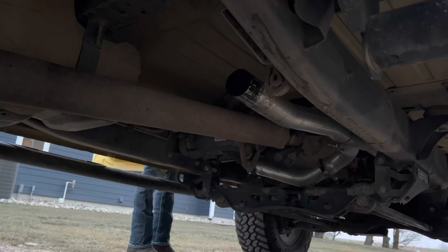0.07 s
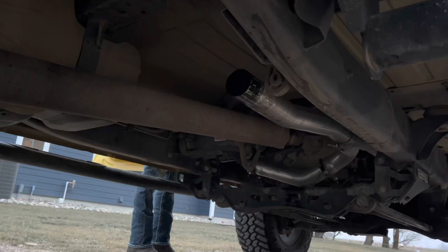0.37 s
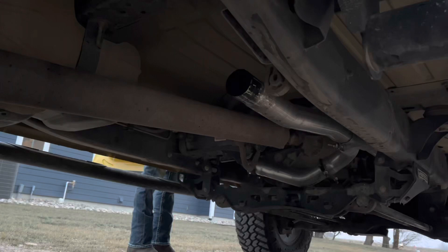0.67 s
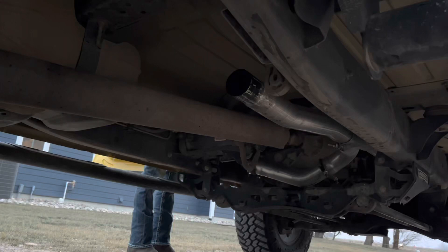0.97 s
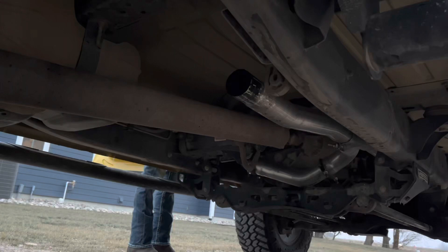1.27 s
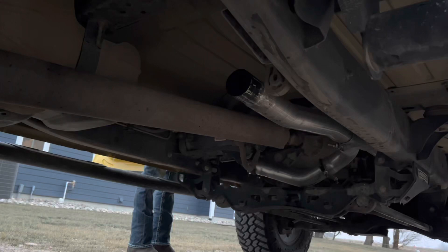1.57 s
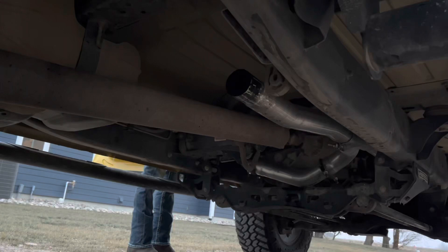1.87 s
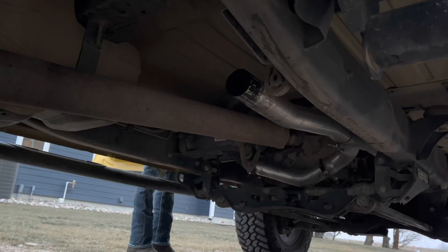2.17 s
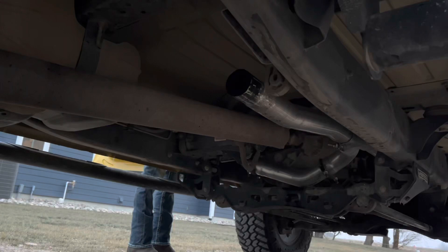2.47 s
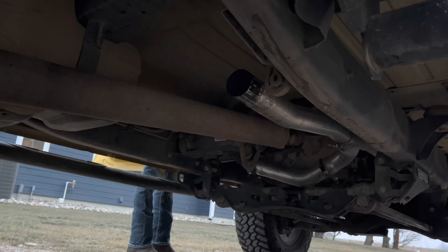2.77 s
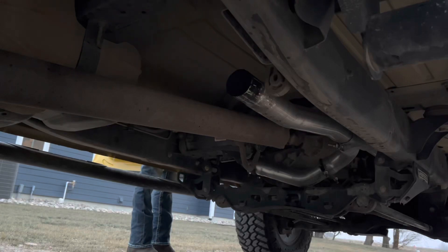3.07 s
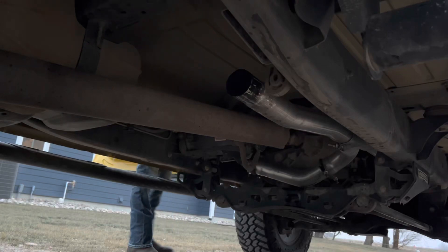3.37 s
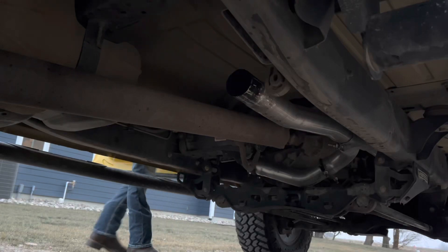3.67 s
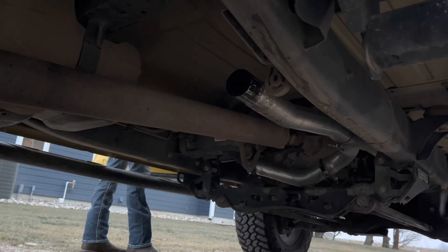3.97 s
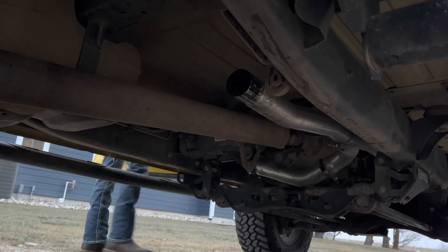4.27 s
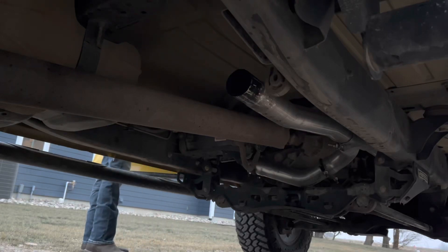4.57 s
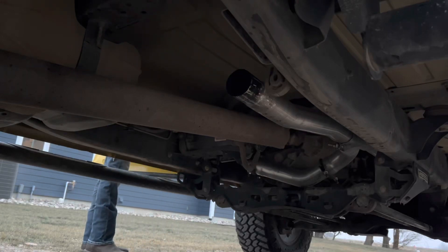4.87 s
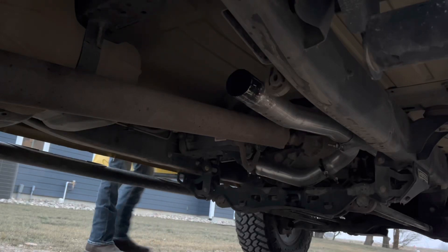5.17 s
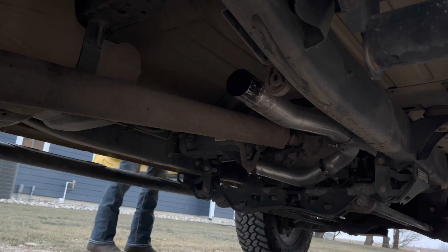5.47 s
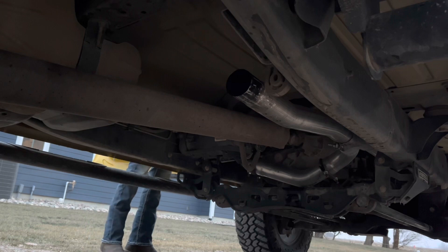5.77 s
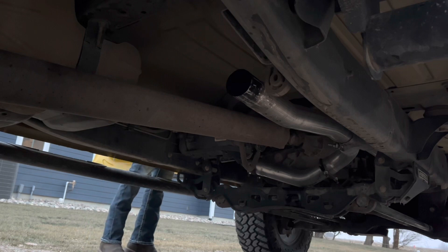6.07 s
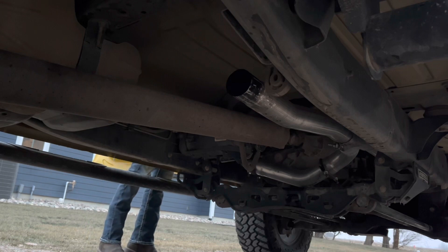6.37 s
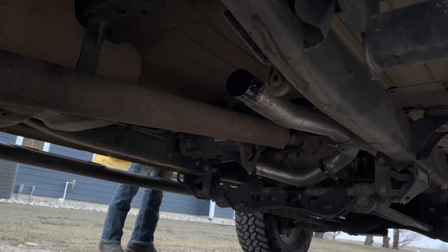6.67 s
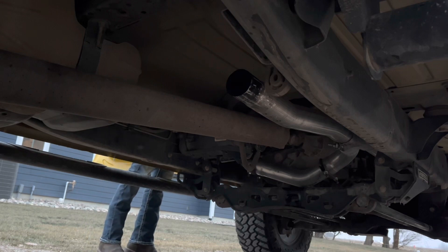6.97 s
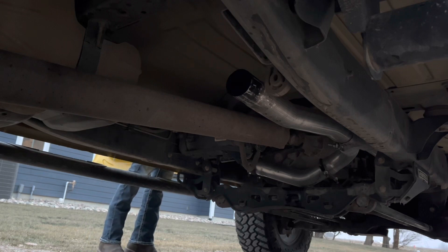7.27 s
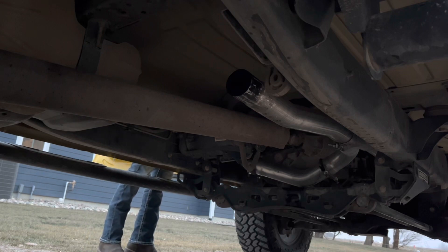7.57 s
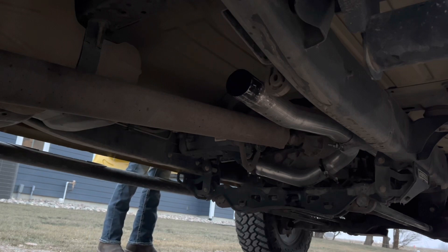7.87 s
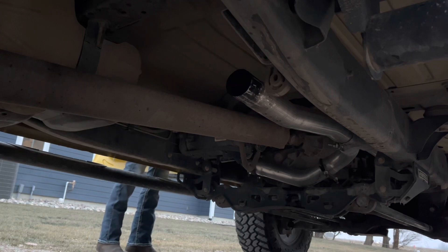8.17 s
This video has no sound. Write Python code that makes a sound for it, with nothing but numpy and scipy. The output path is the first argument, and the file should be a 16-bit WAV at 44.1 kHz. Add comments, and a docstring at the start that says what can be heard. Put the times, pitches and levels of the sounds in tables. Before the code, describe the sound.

A truck starts outdoors, heard close up from beneath its floor. After a short, nearly quiet moment comes a metallic clack and about a second of rhythmic starter cranking. The engine fires in a loud burst, the revs rise briefly and then gradually fall. It settles into a steady, throbbing idle, with bright ticks and the soft spitting of an exhaust leak.

```python
"""A cold V8 pickup starting outdoors, the microphone on the ground under its exhaust pipes.
A fuel pump primes over low rumble, the solenoid clacks and the starter whines against each compression.
The engine catches with a few bangs, flares and sinks to a loping idle. Two cylinder banks ring their
own pipes; every firing also puffs gas and ticks at the manifold, and one cylinder spits through a leak,
now and then harder. Close reflections between floor pan and ground colour the clatter."""
import sys
import numpy as np
from scipy import signal
from scipy.fft import rfft, irfft, next_fast_len
from scipy.io import wavfile
from scipy.ndimage import uniform_filter1d

SR = 44100
rng = np.random.default_rng(int(sys.argv[2]) if len(sys.argv) > 2 else 0)


def int16_out(signal):
    """Quantize to a 16-bit WAV file."""
    q = np.round(np.clip(np.atleast_2d(signal).T, -1, 1) * 32767)
    wavfile.write(sys.argv[1], SR, q.astype(np.int16))


N = 362502
TIME = np.arange(N) / SR
CRANK_START_S, CATCH_S, CRANK_END_S = 1.56, 2.4, 2.45

# the cylinders in firing order, levels relative: bank (0 or 1), pulse_db, travel_ms, puff_db, tick_db
CYLINDER_TRAITS = [(1, -0.5, 5.15, 9.5, 5), (0, -3.5, 7.09, -3, 2.5), (0, -0.5, 6.79, -3.5, 6.5),
                   (1, -0.6, 6.1, -5, -3.5), (0, -0.64, 5.184, 1, 8.5), (1, 2, 5.88, 2, 7.5),
                   (1, 5, 6.095, -0.5, -5), (0, -1.4, 4.56, -15, 6)]
# colour of the exhaust leak: frequency_hz, gain_db
SPIT_COLOUR = [(400, -18), (750, -13), (920, 0), (1150, -3.5), (1600, -3.5), (1830, -18), (2300, -9),
               (3400, -16), (6000, -27), (12000, -38)]


def undb(db):
    """Decibels to gain."""
    return 10 ** (np.asarray(db) / 20)


def unit(x):
    """Scale to rms 1."""
    return x / np.sqrt(np.mean(x ** 2))


def curves(table):
    """Each column of a timed table, joined by straight lines."""
    times, *columns = np.transpose(table)
    return [np.interp(TIME, times, column) for column in columns]


def butter(x, hz, kind, order=2):
    """Butterworth low, high or band pass."""
    return signal.sosfilt(signal.butter(order, hz, kind, fs=SR, output="sos"), x)


def colour(x, points, size=1024):
    """Minimum-phase filter through points of frequency_hz, gain_db."""
    hz, db = np.transpose(points)
    bins_hz = np.maximum(np.arange(size // 2 + 1) * SR / size, 1)
    cepstrum = irfft(np.log(undb(np.interp(np.log(bins_hz), np.log(hz), db))))
    cepstrum[1:size // 2] *= 2
    cepstrum[size // 2 + 1:] = 0
    taps = irfft(np.exp(rfft(cepstrum)))
    return signal.oaconvolve(np.atleast_2d(x), taps[None], axes=1)[:, :N]


def ring(x, modes):
    """Resonances of alternating sign, as along a pipe."""
    return sum((-1) ** k * undb(db) * signal.lfilter(*signal.iirpeak(hz, hz / width_hz, SR), x)
               for k, (hz, width_hz, db) in enumerate(modes))


def noise(side_db):
    """Stereo noise: a common part and a weaker opposed part."""
    mid, side = rng.standard_normal((2, N))
    return mid + undb(side_db) * np.array([side, -side])


def walk(rate_hz):
    """Smooth random wander of rms 1."""
    step = int(SR / rate_hz)
    stairs = np.repeat(rng.standard_normal(N // step + 1), step)[:N]
    return unit(uniform_filter1d(stairs, step))


def steady(x, size=9700):
    """From the catch on, hold the rms near 1 over two idle cycles, keeping the beat within them."""
    power = uniform_filter1d(np.mean(np.atleast_2d(x) ** 2, axis=0), size)
    running = uniform_filter1d(1. * (TIME >= CATCH_S), size)
    return x * np.sqrt(np.abs(running) / (np.abs(power) + 1e-6 * power.max()))


def strikes(times, sizes):
    """A train of single impulses."""
    return np.bincount(np.clip(times * SR, 0, N).astype(int), sizes, N + 1)[:N]


def fade(x, decay_s, rise_s=None):
    """Give each impulse an exponential tail and, if asked, a rounded onset."""
    tails = signal.lfilter([1], [1, -np.exp(-1 / (decay_s * SR))], x)
    return fade(tails, rise_s) if rise_s else tails


def tone(hz, db, flutter_db, waver, waver_hz):
    """A whine whose level and pitch wander."""
    gain = undb(db + flutter_db * walk(12.3)) * np.sqrt(2)
    pitch_hz = hz * (1 + waver * walk(waver_hz))
    return gain * np.sin(2 * np.pi * np.cumsum(pitch_hz) / SR)


def underbody(x, echo_db, own_db, decay_s=0.0094, size=900, count=60):
    """Reflections between floor pan and ground comb the sound, a little differently on each side."""
    lag = rng.integers(8, size, count)
    common, left, right = rng.standard_normal((3, count)) * np.exp(-lag / (decay_s * SR))
    taps = np.array([np.bincount(lag, common + undb(own_db) * own, size) for own in (left, right)])
    taps *= undb(echo_db) / np.sqrt(np.sum(taps ** 2) / 2)
    taps[0, 0] = taps[1, 1] = 1  # the direct sound
    return signal.oaconvolve(np.broadcast_to(x, (2, N)), taps, axes=1)[:, :N]


def outdoor_air():
    """Low open-air rumble with two dull thumps."""
    # colour of the air: frequency_hz, gain_db
    air_colour = [(15, -52), (25, -17), (70, -7), (145, -12.5), (488, -23.5), (930, -40.5), (1010, -39),
                  (1090, -48), (1970, -57), (6460, -53), (8150, -42.5), (12000, -61), (15600, -82),
                  (22000, -120)]
    # soft low swells: peak_s, level_db
    thumps = [(.27, -55), (1.02, -52.5)]
    air = undb(-54.5 + .8 * walk(16)) * unit(colour(noise(side_db=-9), air_colour, size=8192))
    thud = unit(butter(noise(side_db=-14), [55, 230], "band"))
    return air + thud * sum(undb(db) * np.exp(-((TIME - s) / 0.092) ** 2) for s, db in thumps)


def fuel_pump():
    """The pump primes with the ignition on, sinking in pitch as pressure builds."""
    prime_s, start_hz, sag_hz_per_s = 0.73, 690, 47
    pitch_hz = start_hz - sag_hz_per_s * np.minimum(TIME, prime_s)
    whine = tone(pitch_hz, db=-71, flutter_db=1, waver=.016, waver_hz=150)
    return whine * np.clip((prime_s - TIME) / .06, 0, 1)


def electrics():
    """The truck's electrics whine faintly throughout."""
    # thin tones: pitch_hz, level_db
    whines = [(1007, -82.5), (1960, -94), (5539, -90), (7903, -78.5), (8414, -88), (10050, -89),
              (15500, -85)]
    return sum(tone(hz, db, flutter_db=0.5, waver=0.0052, waver_hz=280) for hz, db in whines)


def cranking():
    """Gear mesh rate and load: each compression slows and loads the starter, which then runs free."""
    # compression strokes: start_s, length_s, mesh_hz, sag_hz, load_db
    strokes = [(1.71, .1, 914.6, 74.9, -27.5), (1.883, 0.095, 1105, 309.3, -22.5),
               (2.027, 0.098, 1194, 387.5, -21), (2.168, .075, 1297, 305.2, -21),
               (2.274, .115, 1290, 440, -21.5)]
    start_hz, end_hz = 803, 1300
    attack_s, release_s, hold_share = 0.014, 0.028, 0.78
    corners, load = [(CRANK_START_S, start_hz)], 0
    for s, length_s, hz, sag_hz, db in strokes:
        corners += [(s, hz), (s + length_s, hz - sag_hz)]
        release = np.exp(-np.maximum(TIME - s - hold_share * length_s, 0) / release_s)
        load = load + undb(db) * np.clip((TIME - s) / attack_s, 0, 1) * release
    corner_s, corner_hz = np.transpose(corners + [(CRANK_END_S, end_hz)])
    index = np.arange(len(corner_s))
    leg, part = np.divmod(np.interp(TIME, corner_s, index), 1)
    eased = leg + np.sin(np.pi * part / 2) ** 2
    return np.interp(eased, index, corner_hz), load


def starter():
    """The starter gears whine under load and mostly grind in between."""
    # partials of the gears: mesh_multiple, relative_db
    partials = [(.29, -10), (.5, -7), (1, 0), (1.5, -9), (2, -.5), (3, -6.5), (4, -14)]
    # colour of the grinding: frequency_hz, gain_db
    grind_colour = [(59, 4), (100, 0), (140, -6), (289, -4.5), (328, -7), (424, -5.5), (583, -9), (991, -2),
                    (1360, -15.5), (2270, -6.5), (5080, -15), (6560, -24), (9610, -19.5), (12400, -42),
                    (16000, -22.5)]
    mesh_hz, load = cranking()
    # the partials each flutter in level and waver together in pitch
    phase = 2 * np.pi * np.cumsum(mesh_hz * (1 + .017 * walk(300))) / SR
    whine = sum(undb(db + 3.6 * walk(90)) * np.sin(multiple * phase) for multiple, db in partials)
    pinion = 1 + .4 * np.sin(phase / 9) + .25 * np.sin(2 * phase / 9)  # a swell every nine teeth
    whine = underbody(unit(whine * pinion), echo_db=-8, own_db=-6)
    grind = undb(0.83 * walk(250)) * noise(side_db=-13)
    grind = unit(underbody(colour(grind, grind_colour), echo_db=-7, own_db=-6))
    engaged = np.clip((TIME - CRANK_START_S) / 0.0092 + 1, 0, 1) * (TIME < CRANK_END_S)
    # spinning the engine up from rest loads the gears too
    spin_up = undb(-27.5) * np.exp(-np.maximum(TIME - CRANK_START_S, 0) / 0.42)
    free_whine_db, free_grind_db = -43.5, -30
    whine_gain = np.hypot(undb(-4.5) * load, undb(free_whine_db) + undb(-3) * spin_up)
    grind_gain = np.hypot(np.hypot(undb(-6) * load, undb(free_grind_db)), spin_up)
    return engaged * (grind_gain * grind + whine_gain * whine)


def blows():
    """Metal clacks, from the solenoid on, and the cracks of the first firings."""
    # sharp blows: start_s, level_db, decay_s, treble_lift_db
    hits = [(1.538, -15.5, 0.015, 4), (1.553, -19, 0.0088, 0), (1.77, -25.5, 0.012, 19.5),
            (1.941, -32.5, 0.019, 25), (2.419, -13.5, 0.017, 0), (2.446, -18.5, 0.011, -8),
            (2.465, -10, 0.0042, 5), (2.484, -16, 0.0076, -7), (2.526, -10, 0.01, -10),
            (2.553, -22, 0.01, 0), (2.581, -30, 0.01, 6), (2.694, -17.5, 0.0088, -3),
            (2.819, -16, 0.0022, -5)]
    # colour of a blow: frequency_hz, gain_db
    crack_colour = [(180, -19), (300, -7), (749, -9), (1170, -8.5), (1840, -8.5), (2210, -6.5), (6740, -13),
                    (9550, -17.5), (12900, -33), (16000, -26)]
    crack = unit(underbody(colour(noise(side_db=-21), crack_colour), echo_db=5, own_db=-6.5))
    treble = butter(noise(side_db=-17), 7000, "high")
    out = np.zeros((2, N))
    for s, db, decay_s, lift_db in hits:
        age = np.maximum(TIME - s, 0)
        envelope = np.minimum(age / 0.0035, 1) * np.exp(-age / decay_s)
        out += undb(db) * envelope * (crack + undb(lift_db - 14) * treble)
    return out


def lurches():
    """The block rocks on its mounts with low, dying thuds."""
    # swings of the block: start_s, pitch_hz, level_db, decay_s
    swings = [(1.567, 55.5, -13.5, 0.073), (1.614, 79, -14, 0.078), (1.952, 73, -42, 0.057),
              (2.208, 90, -25, 0.054), (2.407, 50.8, -7, 0.089)]
    out = np.zeros(N)
    for s, hz, db, decay_s in swings:
        age = np.maximum(TIME - s, 0)
        out += undb(db) * np.exp(-age / decay_s) * np.sin(2 * np.pi * hz * age)
    return out


def hard_spits():
    """Now and then the exhaust leak spits harder, with a louder knock."""
    # the stronger spits: start_s, relative_db
    spits = [(3.158, -22), (3.424, -25), (4.483, -33), (4.824, -33.5), (5.105, -32)]
    times, db = np.transpose(spits)
    burst = unit(underbody(colour(noise(side_db=-25), SPIT_COLOUR), echo_db=-9, own_db=-11))
    return fade(strikes(times, undb(db - 4)), decay_s=.007) * burst


def gas_puffs(times, sizes_db, caught):
    """Turbulent gas puffs at each firing over a steady rush from belts and fan; the panels ring."""
    # colour of the gas: frequency_hz, gain_db
    gas_colour = [(240, -36), (400, -1.5), (462, 2), (514, -39.5), (646, -7.5), (711, -16), (1160, -9),
                  (1620, -13.5), (1830, -24), (1990, -9.5), (2530, -8), (2780, -23.5), (3100, -13.5),
                  (3710, -22.5), (7000, -29), (9100, -45), (15400, -120)]
    # resonances of the underbody panels: pitch_hz, width_hz, gain_db
    panels = [(440, 9, -7), (553, 55, -7), (630, 6, -22), (929, 26, 9), (1123, 84, 0.5), (1470, 8.3, -11),
              (1400, 37, -17), (1671, 93, -5), (2413, 93, 2)]
    puffs = fade(strikes(times, undb(sizes_db)), decay_s=0.012, rise_s=0.00025)
    rush = (unit(puffs) + .85 * caught) * noise(side_db=-18)
    gas = unit(colour(rush, gas_colour)) + undb(-4.5) * unit(ring(rush, panels))
    return steady(underbody(gas, echo_db=-4.5, own_db=-16))


def leak(times, sizes):
    """A leak opens for a few milliseconds, spits and makes the engine knock."""
    opening = fade(strikes(times, sizes), decay_s=.005, rise_s=.0004)
    spits = colour(opening * noise(side_db=-18), SPIT_COLOUR)
    return steady(underbody(spits, echo_db=-11, own_db=-8))


def manifold_ticks(times, sizes_db, caught):
    """Each firing ticks brightly at the manifold, over a steady hiss."""
    # colour of the ticks: frequency_hz, gain_db
    tick_colour = [(2500, -9), (4500, -1), (5600, -2.5), (6700, 1), (8000, 1), (9600, 3), (11500, -5),
                   (13000, -9.5), (15500, -2.5)]
    envelope = fade(strikes(times, undb(sizes_db)), decay_s=0.0012, rise_s=0.00066)
    ticks = colour((unit(envelope) + 0.74 * caught) * noise(side_db=-13), tick_colour)
    return steady(underbody(ticks, echo_db=4, own_db=-16))


def exhaust(times, cylinder):
    """Boom and bark: each bank's pulses ring its own pipe; under load they have sharper edges."""
    # resonances of each bank's pipe, and the higher ones that bark: pitch_hz, width_hz, gain_db
    pipe_a = [(44.5, 4.3, 7.5), (82.3, 31.4, 7.5), (104.6, 27.65, 10), (162.75, 35, 7.5), (174.36, 35.6, 7),
              (214.7, 8, 1.5), (269.4, 7.8, -5.5), (334.2, 12.2, -13), (437.5, 6.9, -19.5)]
    pipe_b = [(52.6, 7.1, 6.5), (69, 46.5, 1.15), (101.6, 6.04, 11.5), (132.9, 5.2, -2.5),
              (167.8, 13.3, -1), (220.2, 11.92, 15), (220, 16.58, 14.5), (268, 190, -20), (440, 170, -31)]
    bark_modes = [(435, 68, 2), (470, 37, 0), (553, 33.4, 1), (643, 21, -1.5), (953, 110, -4),
                  (1330, 420, -8.5)]
    # sharp edge of the pulses: time_s, relative_db
    sharpness = [(2.4, -7), (2.8, 7.5), (3.3, 13), (3.8, -2), (4.2, 8), (4.7, -2), (5.3, -55), (8.2, -42)]
    bank, pulse_db, travel_ms = np.array(CYLINDER_TRAITS)[cylinder].T[:3]
    # combustion is uneven at the catch and soon settles
    scatter_db = 1.27 + 2.5 * np.exp((CATCH_S - times) / 0.51)
    time_luck, size_luck = rng.standard_normal((len(times), 2)).T
    arrivals = times + (travel_ms + .12 * scatter_db * time_luck) / 1000
    sizes = undb(pulse_db + scatter_db * size_luck)
    pipes = ring(strikes(arrivals, sizes * (bank == 0)), pipe_a)
    pipes += ring(strikes(arrivals, sizes * (bank == 1)), pipe_b)
    pipes = butter(butter(pipes, 36, "high"), 36, "high")  # open pipe ends radiate no deep bass
    pipes = butter(pipes, 700, "low")  # the mufflers take the treble
    edge = 2 * undb(curves(sharpness)[0]) * butter(pipes, 300, "high", order=1)
    bark = butter(ring(strikes(arrivals, sizes), bark_modes), [330, 1700], "band")
    return steady(pipes + edge), steady(bark)


def engine():
    """Eight cylinders fire in turn: a pipe pulse, a puff of gas and a tick each; one of them spits."""
    # engine speed, a flare that sinks to idle: time_s, firing_hz
    speed = [(2.4, 53.52), (2.8, 123.31), (2.95, 139.32), (3.15, 149.25), (3.3, 151.77), (3.5, 146.05),
             (3.75, 128.16), (4.25, 108.82), (4.55, 98.07), (4.85, 88.61), (5.5, 72.72), (6.3, 71.98),
             (6.8, 73.54), (7.3, 72.75), (8.22, 74.02)]
    # effort of the running engine, levels relative: time_s, pipe_db, gas_db
    effort = [(2.62, -9.5, -21.5), (3.44, -15.5, -34), (3.59, -18, -39), (4.69, -17, -43),
              (4.89, -20.5, -45.5), (6.17, -19.5, -39), (7.64, -17, -38.5), (8.02, -15, -36),
              (8.05, -16, -38.5)]
    idle_hz, leaky_cylinder = 73, 7
    firing_hz, = curves(speed)
    pipe_db, gas_db = curves(effort)
    fired = np.cumsum(firing_hz * (TIME >= CATCH_S)) / SR
    count = np.arange(1, int(fired[-1]) + 1)
    times = np.interp(count, fired, TIME)
    cylinder = count % len(CYLINDER_TRAITS)
    puff_db, tick_db = np.array(CYLINDER_TRAITS)[cylinder].T[3:]
    puff_luck, tick_luck, lag_luck, leak_luck = rng.standard_normal((len(times), 4)).T
    caught = np.clip((TIME - CATCH_S - .012) / 0.0049, 0, 1)
    boom, bark = exhaust(times, cylinder)
    gas = gas_puffs(times, puff_db + 2.3 * puff_luck, caught)
    spits = leak(times - .004, (cylinder == leaky_cylinder) * undb(1.6 * leak_luck))
    ticks = manifold_ticks(times + 0.0012 + 0.00061 * lag_luck, tick_db + 2.2 * tick_luck, caught)
    # as the revs rise, the leak grows a little and the bark a lot
    octaves = np.log2(firing_hz / idle_hz)
    spit_db, bark_db = -8.5 + 1.5 * octaves, -12.5 + 14.5 * octaves
    clatter = undb(0.5) * gas + undb(spit_db) * spits + undb(-1.5) * ticks
    return undb(pipe_db - 0.15) * boom + undb(gas_db) * (clatter + undb(bark_db) * bark)


def scene():
    """Everything as heard on the ground under the truck."""
    truck = engine() + hard_spits() + starter() + blows() + lurches()
    fade_in = np.minimum(TIME / 0.094, 1) ** 2
    return truck + fade_in * (outdoor_air() + fuel_pump() + electrics())


def record(dry):
    """A phone's two microphone ports differ in level and phase; it rounds peaks and cuts the top."""
    # left port against right: frequency_hz, difference_db, lead_rad
    ports = [(40, .5, .1), (100, 1, .15), (190, 3, .25), (420, 0, .1), (690, 5, 1.1), (790, -2, .4),
             (930, 5.5, .4), (1340, 5.5, -.7), (1950, 0, 0), (2650, 0, 0), (3100, 2, .9), (5100, 1, 0),
             (6600, 2.5, -3.14), (8500, 0, -6.2), (10100, 0, -6.3), (15200, 0, -12.5)]
    hz, difference_db, lead_rad = np.transpose(ports)
    size = next_fast_len(N + 4096)
    bins_hz = np.arange(size // 2 + 1) * SR / size
    half = undb(np.interp(bins_hz, hz, difference_db) / 2) * np.exp(.5j * np.interp(bins_hz, hz, lead_rad))
    heard = irfft(rfft(dry, size) * np.array([half, 1 / half]), size)[:, :N]
    rounded = heard / (1 + np.abs(heard) ** 8) ** (1 / 8)
    return signal.sosfilt(signal.ellip(10, .2, 70, 16000, fs=SR, output="sos"), rounded)


dry = scene()
out = record(dry)
int16_out(out)
```